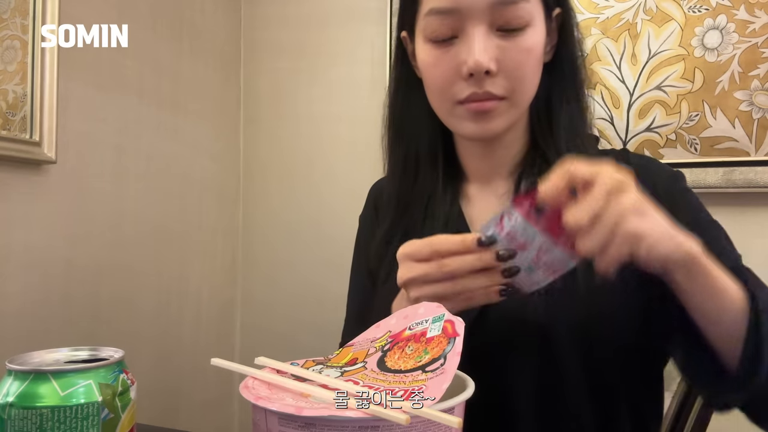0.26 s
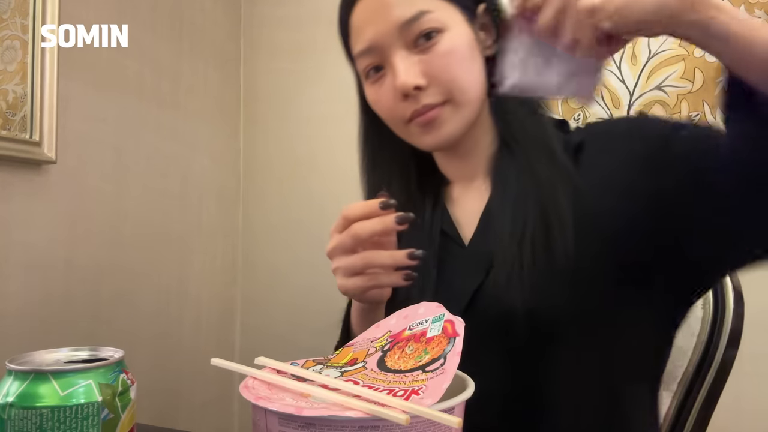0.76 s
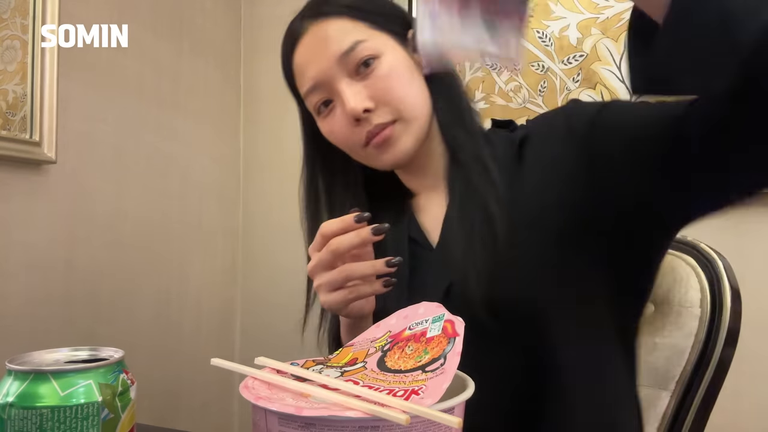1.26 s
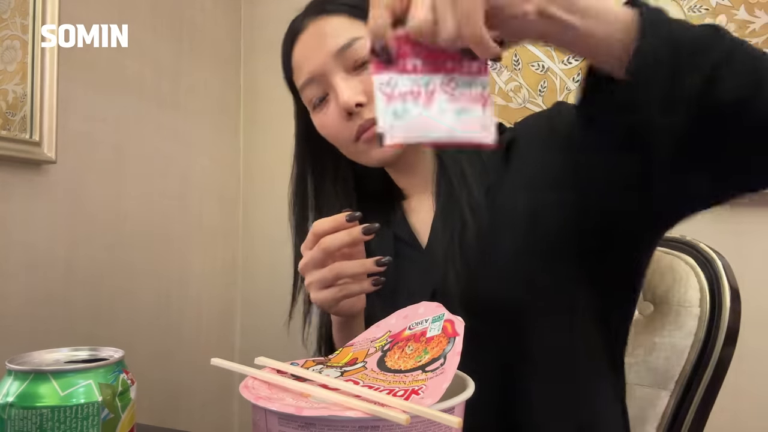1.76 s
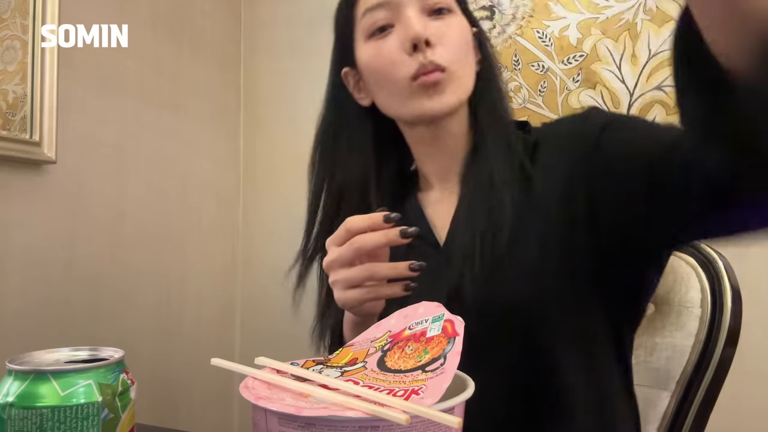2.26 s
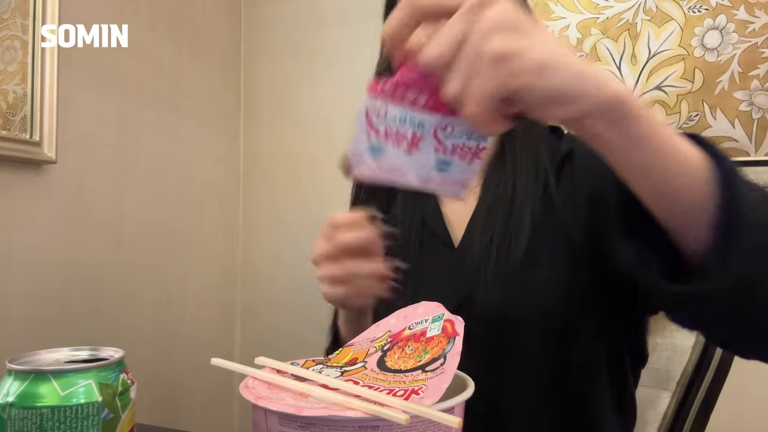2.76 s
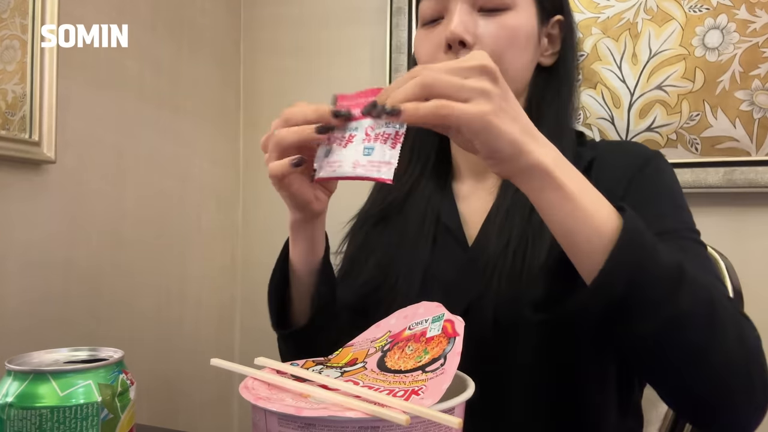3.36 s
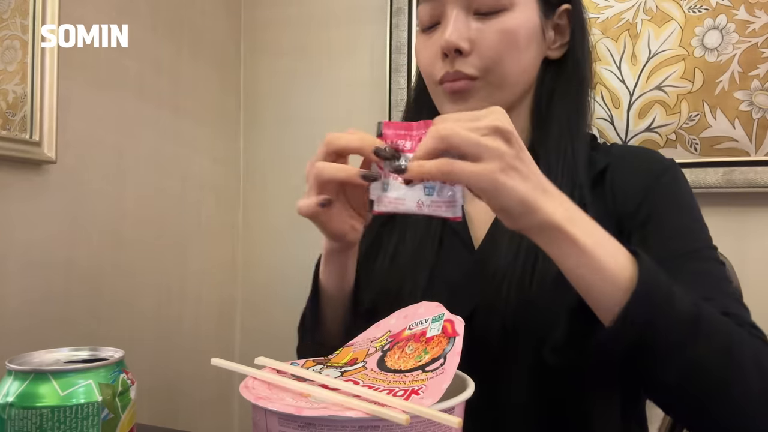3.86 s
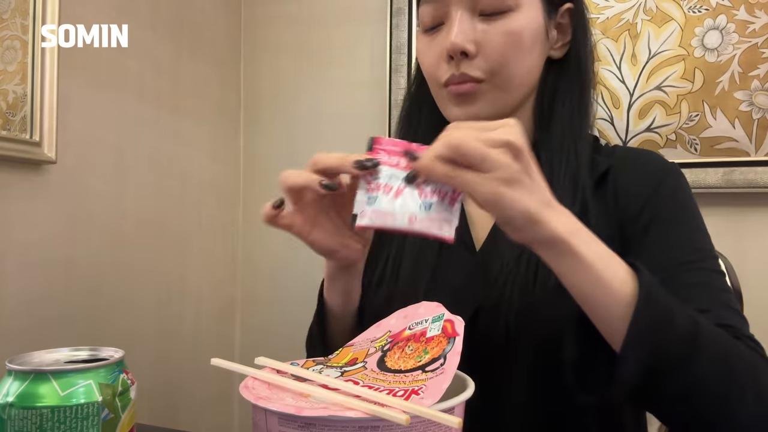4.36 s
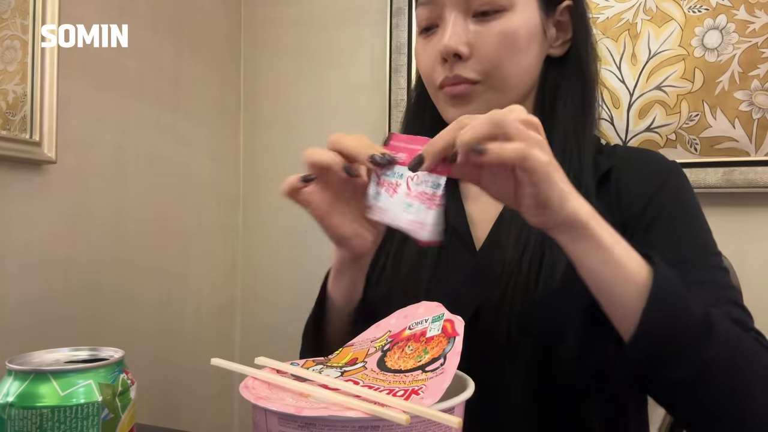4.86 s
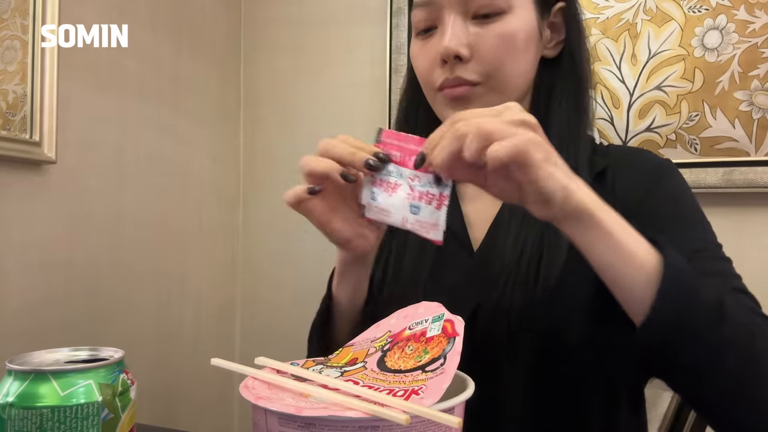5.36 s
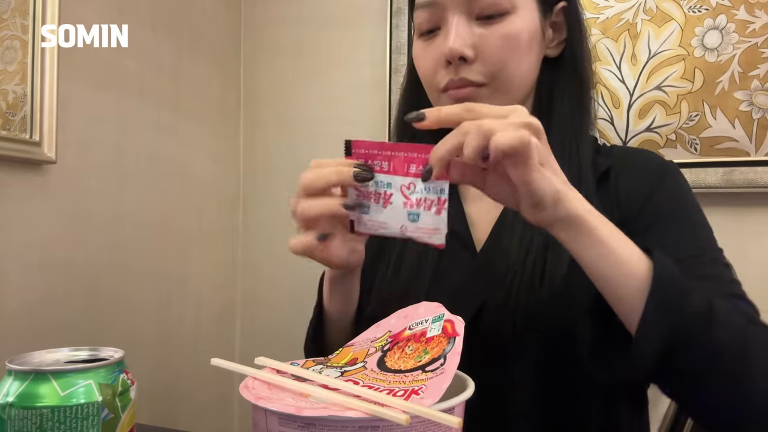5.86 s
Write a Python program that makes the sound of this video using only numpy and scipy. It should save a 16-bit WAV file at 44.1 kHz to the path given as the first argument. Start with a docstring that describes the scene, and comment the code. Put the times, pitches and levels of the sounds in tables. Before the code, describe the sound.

A filled foil-plastic sauce sachet is shaken in quick swings, then pinched and worked between fingers, crackling densely and loudly close to the microphone.

```python
"""Throughout, a low wavering hum lies under the room's rumble. A foil-plastic sauce sachet is first shaken by
its top edge in quick runs of swings: each looses a cloud of tiny crackles, and the filled pouch pops as it flexes.
It is then turned in the fingertips with light ticks, pinched and worked open by both hands close to a
microphone, and lightly fingered again. Each crease is a burst of noise filtered by the film's own resonance;
each pop is a damped sine of falling pitch; the table top and walls answer briefly."""
import sys
import numpy as np
from scipy import signal
from scipy.fft import rfft, irfft
from scipy.io import wavfile
from scipy.ndimage import uniform_filter1d, map_coordinates

SR = 44100
rng = np.random.default_rng(int(sys.argv[2]) if len(sys.argv) > 2 else 0)


def transcribe(u):
    """Save the signal u as a 16-bit wav file named by the first command-line argument.

    u: samples, shape (n,) or (channels, n), limited to [-1, 1]; the rate is SR.
    q: integer samples, one column per channel.
    """
    v = np.clip(np.atleast_2d(u).T, -1, 1)
    q = np.round(v * 32767).astype(np.int16)
    wavfile.write(sys.argv[1], SR, q)


N = 269010
T = np.arange(N) / SR

# Room rumble, spectral density: frequency_hz, relative_density_db (per Hz)
RUMBLE_SPECTRUM = [(15, 1.5), (29, -6), (39, -23), (52, 5), (70, -4), (130, 0.5), (170, -3.5), (240, -10.5),
                   (330, -13.5), (600, -22), (850, -23), (1400, -41), (4000, -47), (16000, -55)]
# Strength of the deep hum: time_s, level_db
HUM_LEVEL = [(0, -48), (0.25, -76.5), (0.55, -40), (1.0, -37), (1.25, -49), (1.85, -39), (2.55, -38),
             (2.75, -57), (2.92, -34.5), (3.3, -46.5), (4.75, -43.5), (6.1, -45.5)]
# Weaker companions of the hum: frequency_hz, level_db, wander_rate_hz
NARROW_DRONES = [(127.6, -44.5, 9), (243.3, -51, 5)]
# Colour of the room's answer: frequency_hz, gain_db
WALL_COLOUR = [(100, 1.5), (450, 0), (900, 2.5), (2000, -1.5), (5000, -2), (9000, -7), (16000, -0.5)]
# Table-top echo, later the higher the sachet is held: time_s, lag_ms
TABLE_LAG = [(.4, 0.43), (1, 0.57), (2.25, 0.72), (3, 0.486), (6.1, 0.4)]
# Colour of a broad, slack facet of film: frequency_hz, relative_gain_db
SLACK_COLOUR = [(100, -33.5), (300, -6.5), (520, -4), (780, -8), (1150, 1.4), (1650, -1), (2250, -2.5),
                (2900, -10), (4400, -10.5), (7000, -10), (11000, -21.5), (16000, -27)]
# Colour of a small, taut crease: frequency_hz, relative_gain_db
TAUT_COLOUR = [(100, -58), (900, -21), (1500, 6), (2300, 6), (3300, 2), (4800, 2.5), (6000, 0), (7200, 0),
               (9200, -0.5), (11500, -5.5), (14000, -3.5), (16000, -16)]
# Steady crinkling under the fingers: time_s, relative_level_db
GRIP_LEVEL = [(0.0, -48), (0.2, -82), (0.3, -50), (0.5, -35), (1.1, -36), (1.24, -55), (1.35, -38.5),
              (1.68, -36), (1.84, -48), (2.0, -31), (2.6, -36), (2.85, -48), (3.55, -45), (3.8, -33),
              (4.2, -38), (5.0, -31.5), (5.65, -32.5), (5.95, -47.5)]
# Swings of the shaken sachet; the crackle swells up to the pop's moment, holds, then lets go:
# pop_s, relative_crackle_db, hold_s, relative_pop_db
SWING_STROKES = [(0.408, -23.5, .04, -34), (0.522, -22.5, .04, -41.5), (0.632, -23.5, .012, -26),
                 (0.683, -24.5, .02, -38), (0.79, -34, .025, -33.5), (0.845, -29, .06, -37),
                 (0.963, -25, .03, -28.5), (1.045, -26, .06, -32), (1.177, -33, .012, -34.5),
                 (1.315, -23, .03, -35), (1.41, -24, .04, -25), (1.518, -22, .03, -22),
                 (1.615, -21, .045, -25.5), (1.752, -32.5, .008, -29.5), (1.904, -26, .025, -27),
                 (1.991, -18.5, .04, -17.5), (2.11, -23.5, .03, -26.5), (2.192, -17, 0.018, -23.5),
                 (2.242, -22, .012, -60.5), (2.3, -31, .008, -30), (2.335, -23, .022, -35),
                 (2.402, -22, .02, -23.5), (2.452, -27, .008, -35), (2.532, -19, .022, -35),
                 (2.617, -19, .012, -26.5)]
# Pinches with both hands, in the same form: pop_s, relative_crackle_db, hold_s, relative_pop_db
PINCH_STROKES = [(3.222, -34, .008, -36), (3.463, -36, .005, -32.5), (3.705, -28, .05, -35),
                 (3.83, -22, .03, -26), (3.908, -23, .03, -25), (4.005, -24, .03, -47),
                 (4.137, -25, .035, -33), (4.254, -22, .02, -39), (4.36, -26, .045, -34),
                 (4.457, -26.5, .02, -53), (4.557, -27, .022, -42), (4.685, -25, .012, -53),
                 (4.764, -25, .01, -29), (4.838, -25, .015, -25), (4.915, -26.5, .035, -30),
                 (5.019, -27, .045, -19), (5.1, -24, .015, -25), (5.14, -31, .02, -22.5),
                 (5.187, -24.5, .01, -21.5), (5.255, -20.5, .01, -18.5), (5.333, -18.5, .01, -31),
                 (5.355, -27.5, .02, -17.5), (5.425, -27, .08, -22.5), (5.522, -25, 0.052, -15),
                 (5.601, -28.5, .03, -20), (5.665, -23, .03, -50), (5.71, -33, 0.061, -33),
                 (6.074, -27.5, .006, -36)]
# Fingertips shifting lightly on the sachet: start_s, end_s, typical_level_db
FINGER_TOUCHES = [(2.72, 3.52, -28), (5.78, 6.085, -27)]
# Firmness of the fingers on the filled part: time_s, gain_db
FINGER_PRESSURE = [(2.6, -14.5), (3, -7.5), (3.8, -17), (4.6, -12), (5.1, -6.5), (5.8, -11)]
# Tautness of the middling creases, as their central ring: time_s, pitch_hz
CREASE_PITCH = [(1.7, 4450), (2.3, 3520), (3.4, 3280), (4.6, 4060)]
# Loudest and isolated creases: time_s, relative_level_db (over 2 ms), central_pitch_hz
LOUD_SNAPS = [(0.0165, -28.5, 4200), (0.116, -51, 10470), (0.2525, -25, 4050), (0.319, -29, 2510),
              (0.3417, -22.5, 2700), (0.406, -16, 4130), (0.5242, -14, 3560), (0.5276, -13.5, 4320),
              (0.601, -21.5, 2864), (0.6267, -16, 3430), (0.6342, -25, 2940), (0.6931, -11.5, 3500),
              (0.842, -15.5, 1850), (0.8851, -16.5, 6400), (0.9695, -11, 4900), (1.0954, -21, 3560),
              (1.185, -21, 7040), (1.2648, -20.5, 3250), (1.3249, -12, 4340), (1.4083, -12, 5600),
              (1.4309, -5.5, 3670), (1.4435, -14, 5700), (1.5185, -13, 2030), (1.6126, -13, 6700),
              (1.6475, -15.5, 2940), (1.8165, -19.5, 1640), (1.906, -21.5, 3000), (1.99, -11, 3200),
              (1.9961, -15, 5500), (2.0054, -13, 3550), (2.0303, -24, 7300), (2.0804, -17.5, 2500),
              (2.1074, -7, 3900), (2.1388, -16.5, 5330), (2.2076, -8, 5600), (2.238, -11.5, 6550),
              (2.2983, -13, 2280), (2.3274, -9, 1510), (2.348, -11, 4100), (2.3516, -9.5, 2320),
              (2.3585, -11.5, 2830), (2.4007, -8.5, 6300), (2.417, -8.5, 4580), (2.454, -9, 4920),
              (2.4927, -11.5, 5100), (2.5464, -11, 2920), (2.622, -9.5, 6600), (2.7058, -20.5, 3670),
              (2.734, -19.5, 2360), (2.8584, -37, 2960), (2.9064, -48, 2100), (2.9789, -37.5, 3800),
              (3.329, -27, 2750), (3.3326, -21.5, 2340), (3.403, -25, 3100), (3.4181, -17, 5160),
              (3.4654, -23.5, 2150), (3.5624, -15, 4670), (3.665, -29, 5070), (3.703, -12.5, 2800),
              (3.7344, -12.5, 4550), (3.7614, -20.5, 5130), (3.8344, -12.5, 3820), (3.9164, -15, 6700),
              (4.0067, -15, 5300), (4.111, -14, 3800), (4.1687, -40, 5400), (4.2065, -22, 4350),
              (4.2499, -12.5, 5650), (4.361, -17.5, 2800), (4.3948, -14.5, 5900), (4.4701, -8, 3630),
              (4.561, -22.5, 3020), (4.6477, -11.5, 4250), (4.6529, -10.5, 3970), (4.6941, -17.5, 4000),
              (4.754, -17, 4440), (4.76, -9.5, 6750), (4.846, -12, 5360), (4.8907, -20, 3340),
              (4.9497, -17, 3400), (5.0184, -7.5, 4830), (5.1372, -10, 3330), (5.1578, -9.5, 7100),
              (5.182, -9, 3400), (5.2531, -15, 3500), (5.3149, -8, 5900), (5.3375, -11.5, 4740),
              (5.3544, -7.5, 3880), (5.41, -18, 3600), (5.4221, -24, 2200), (5.4307, -14.5, 4550),
              (5.452, -22, 3630), (5.472, -14, 4900), (5.5197, -8.5, 4700), (5.558, -16.5, 5500),
              (5.5993, -13, 4570), (5.6525, -8, 4900), (5.6608, -10, 5150), (5.689, -1, 4100),
              (5.8173, -25, 2980), (5.9545, -24, 2230), (6.0741, -29, 3250)]

HUM_HZ = 56.4
ROOM_T60_S = .27
SLACK_HZ, TAUT_HZ = 2060, 5730  # ring of a wholly slack and a wholly taut fold
POP_HZ, POP_AT_DB, POP_FALL_HZ_PER_DB = 505, -34.5, 2.5  # a deeper flex pops lower
RISE_S = .00035  # a snap starts this long before its listed time
SNAP_SPAN = np.sqrt(.002 * SR)  # gives a unit-energy fold an rms of one over 2 ms
TOP_HZ = 16000


def undb(db):
    """Decibel law: a level becomes an amplitude gain."""
    return 10 ** (np.asarray(db) / 20)


def unit(x):
    """Normalisation: scale to an rms of one."""
    return x / np.sqrt(np.mean(x ** 2))


def curve(rows):
    """Linear interpolation: join (time_s, value) rows by straight lines."""
    return np.interp(T, *np.transpose(rows))


def add(out, s, sound):
    """Superposition: mix a sound in, starting at s seconds."""
    i = int(np.clip(s * SR, 0, N - 1))
    out[i:i + len(sound)] += sound[:N - i]


def shape(points, size):
    """Spectral envelope: gain at each bin, joined over log frequency from (frequency_hz, gain_db) rows."""
    hz, db = np.transpose(points)
    bins = np.fft.rfftfreq(size, 1 / SR) + 1
    return undb(np.interp(np.log(bins), np.log(hz), db))


def colour(x, gain):
    """Minimum-phase filtering: a causal response to the given gains keeps attacks sharp."""
    size = len(x)
    cepstrum = irfft(np.log(gain + 1e-9), size)
    # folding the cepstrum onto positive time makes the response causal
    cepstrum[1:size // 2] *= 2
    cepstrum[size // 2 + 1:] = 0
    return irfft(rfft(x) * np.exp(rfft(cepstrum)), size)


def band_noise(x, low_hz, high_hz):
    """Band-pass filtering: the part of x between two frequencies, at unit rms."""
    band = signal.butter(3, [low_hz, high_hz], "band", fs=SR, output="sos")
    return unit(signal.sosfilt(band, x))


def walk(rate):
    """Low-passed random drift: held random values, smoothed twice, with a spread near one."""
    k = int(SR / rate)
    held = np.repeat(rng.standard_normal(N // k + 1), k)
    smooth = uniform_filter1d(uniform_filter1d(held, k), k)
    return unit(smooth[:N])


def ticks(rate, scatter_db):
    """Poisson process: impulses at random moments, many small, few large; power is independent of rate."""
    fires = rng.random(N) < rate / SR
    heights = undb(scatter_db * np.minimum(rng.exponential(size=N), 3.5))
    return unit(fires * heights / np.sqrt(rate))


def background(rumble_db=-40, waver=0.0057):
    """Steady sources: a frequency-modulated hum and two narrow-band drones over shaped noise."""
    spectrum = rfft(rng.standard_normal(N)) * shape(RUMBLE_SPECTRUM, N)
    out = undb(rumble_db) * unit(irfft(spectrum, N))
    phase = 2 * np.pi * np.cumsum(HUM_HZ * (1 + waver * walk(4.87))) / SR
    out += undb(curve(HUM_LEVEL)) * unit(np.sin(phase))
    for hz, db, width in NARROW_DRONES:
        turn = 2 * np.pi * hz * T
        # drifting sine and cosine parts broaden the line
        out += undb(db) * unit(walk(width) * np.sin(turn) + walk(width) * np.cos(turn))
    return out


def room(x, wet_db=-10, early_db=-16, early_s=0.00991, size=16384):
    """Reverberation: scattered reflections from table and near wall, then an exponential diffuse tail."""
    t = np.arange(size) / SR
    decay = np.exp(-np.log(1000) * t / ROOM_T60_S)
    tail = rng.standard_normal(size) * decay * (1 - np.exp(-t / 0.0081))
    early = rng.standard_normal(size) * (t > early_s) * np.exp(-np.abs(t - early_s) / 0.0016)
    response = (undb(wet_db) * unit(tail) + undb(early_db) * unit(early)) / np.sqrt(size)
    return x + signal.oaconvolve(x, colour(response, shape(WALL_COLOUR, size)))[:N]


def table_top(x, echo_db=-12.0):
    """Comb interference: one delayed echo combs the sachet's sound; the comb slides with the hand's height."""
    late = np.arange(N) - curve(TABLE_LAG) * SR / 1000  # fractional sample positions
    return x + undb(echo_db) * map_coordinates(x, [late], order=3)


def swells(strokes, attack_s, release_s):
    """Exponential build-up and release: summed power of strokes that swell up to pop_s, hold and let go."""
    power = np.zeros(N)
    for pop_s, db, hold, _ in strokes:
        near = (T > pop_s - 8 * attack_s) & (T < pop_s + hold + 8 * release_s)
        t = T[near] - pop_s
        envelope = np.exp(np.minimum(t, 0) / attack_s - np.maximum(t - hold, 0) / release_s)
        power[near] += (undb(db) * envelope) ** 2
    return power


def strain(swing_db=-0.5, pinch_db=-0.5, grip_db=-1.5):
    """Power addition: the working of the film is the steady grip plus a swell per swing or pinch."""
    grip = undb(curve(GRIP_LEVEL) + grip_db) ** 2
    swings = undb(swing_db) ** 2 * swells(SWING_STROKES, attack_s=.008, release_s=.008)
    pinches = undb(pinch_db) ** 2 * swells(PINCH_STROKES, attack_s=.0035, release_s=.006)
    return np.sqrt(grip + swings + pinches)


def fold(hz, rise_s=0.00021, flutter_s=0.0034, flutter_db=-19, ring_db=9, ring_octaves=0.24, detune=0.3,
         edge_db=3.0, edge_hz=9500, size=1024):
    """Buckling: a jolt and a flutter excite the film; taut folds are brighter and die sooner. Unit energy."""
    t, bins = np.arange(size) / SR, np.fft.rfftfreq(size, 1 / SR) + 1
    taut = np.clip(np.log(hz / SLACK_HZ) / np.log(TAUT_HZ / SLACK_HZ), 0, 1)
    decay_s = 0.000686 - 0.0002303 * taut
    jolt = np.exp(-t / decay_s) + undb(flutter_db) * np.exp(-t / flutter_s)
    jolt *= 1 - np.exp(-t / rise_s)
    slack_power = unit(shape(SLACK_COLOUR, size)) ** 2
    taut_power = unit(shape(TAUT_COLOUR, size)) ** 2
    film = np.sqrt((1 - taut) * slack_power + taut * taut_power)
    # every fold has a resonance of its own, and a sharper or blunter edge
    octaves = np.log2(bins / hz) + detune * rng.standard_normal()
    ring = undb(ring_db / (1 + (octaves / ring_octaves) ** 2))
    edge = undb(edge_db * rng.standard_normal() * bins ** 2 / (bins ** 2 + edge_hz ** 2))
    sound = colour(jolt * rng.standard_normal(size), film * ring * edge)
    return sound / np.linalg.norm(sound)


def fingertips(rate=24, unevenness=.5, scatter_db=3, ring_hz=2900, spread=0.23, knock_db=-7, knock_hz=490,
               knock_s=.003, count=40, size=1024):
    """Coupled bodies: separate ticks of slack film, each with a soft damped knock of the pouch behind it."""
    out, t = np.zeros(N), np.arange(size) / SR
    for start, end, db in FINGER_TOUCHES:
        wait, strength, tone = rng.standard_normal((count, 3)).T
        moments = start + np.cumsum(np.exp(unevenness * wait)) / rate
        louder_db = scatter_db * np.clip(strength, -2, 1)
        for s, louder, detune in zip(moments, louder_db, np.exp(spread * tone)):
            knock = t * np.exp(-t / knock_s) * np.sin(2 * np.pi * knock_hz * detune * t)
            tick = fold(ring_hz * detune) + undb(knock_db) * knock / np.linalg.norm(knock)
            if s < end:
                add(out, s, undb(db + louder) * SNAP_SPAN * tick)
    return out


def knead(force, rate=220, scatter_db=3, deep_db=-7):
    """Band-limited excitation: hollow wall buckles and a dull sauce thud, stronger as the fingers close."""
    pushes = force * undb(curve(FINGER_PRESSURE)) * ticks(rate, scatter_db)
    wall = band_noise(pushes, low_hz=450, high_hz=740)
    sauce = band_noise(pushes, low_hz=170, high_hz=300)
    return pushes.std() * (wall + undb(deep_db) * sauce)


def pouch(gain_db=-0.5, decay_s=0.0024, rise_s=0.0014, sag=0.27, sag_s=0.0031, slosh_db=-15,
          slosh_s=0.0069, slosh_low=0.39, slosh_high=1.5, detune=0.027, size=2048):
    """Snap-through: at each stroke the wall pops over in a few low, sagging cycles, damped by the sauce."""
    out, t = np.zeros(N), np.arange(size) / SR
    for pop_s, _, _, db in list(SWING_STROKES) + list(PINCH_STROKES):
        hz = POP_HZ - POP_FALL_HZ_PER_DB * (db - POP_AT_DB)
        hz *= np.exp(detune * rng.standard_normal())
        pitch = hz * (1 - sag + 2 * sag * np.exp(-t / sag_s))
        pop = np.sin(2 * np.pi * np.cumsum(pitch) / SR) * np.exp(-t / decay_s)
        slosh = band_noise(rng.standard_normal(size), hz * slosh_low, hz * slosh_high)
        slosh *= np.exp(-t / slosh_s)
        sound = (1 - np.exp(-t / rise_s)) * (pop + undb(slosh_db) * slosh)
        # the level is that of the first eighth
        add(out, pop_s, undb(db + gain_db) * sound / sound[:size // 8].std())
    return out


def crinkle(force, shaken_rate=1000, pinched_rate=580, scatter_db=3.5, shaken_hz=2900, pinched_hz=3650,
            spread=0.56, crowding=0.4, count=24):
    """Crackling noise: swarms of tiny folds, denser under force; sparser and higher once both hands pull taut."""
    out = np.zeros(N)
    pinch_s = 3
    shaken = (T < pinch_s, shaken_rate, shaken_hz)
    pinched = (T >= pinch_s, pinched_rate, pinched_hz)
    for held, rate, hz in (shaken, pinched):
        pushes = (force * ticks(rate * unit(force) ** crowding, scatter_db))[held]
        which = rng.integers(0, count, held.sum())  # each push sounds one of the folds
        for k, offset in enumerate(np.linspace(-1.7, 1.7, count)):
            swarm = signal.oaconvolve(pushes * (which == k), fold(hz * np.exp(spread * offset)))
            add(out, T[held][0], swarm)
    return out


def creases(force, gain_db=-1, shaken_rate=85, pinched_rate=60, crowding=.7, unevenness=.5, scatter_db=3,
            spread=0.36, count=900):
    """Stick and release: strain builds up until a middling crease gives way, sooner and louder under force."""
    out = np.zeros(N)
    rate = curve([(2.7, shaken_rate), (3.3, pinched_rate)]) * unit(force) ** crowding
    ring_hz = curve(CREASE_PITCH)
    wait, strength, tone = rng.standard_normal((count, 3)).T
    # a crease goes when the accumulated strain reaches its random threshold
    thresholds = np.cumsum(np.exp(unevenness * wait))
    moments = np.searchsorted(np.cumsum(rate) / SR, thresholds)
    gains = unit(undb(scatter_db * np.clip(strength, -2, 1)))
    for i, gain, detune in zip(moments, gains, np.exp(spread * tone)):
        if i < N:
            level = undb(gain_db) * gain * force[i] * np.sqrt(SR / rate[i])
            add(out, T[i], level * fold(ring_hz[i] * detune))
    return out


def snaps(force, gain_db=1.0, neighbour_db=1, before_s=0.0028, after_s=.005):
    """Triggered buckling: each loud crease rings; a fold in the strained film gives way just before and after."""
    out = np.zeros(N)
    for s, db, hz in LOUD_SNAPS:
        add(out, s - RISE_S, undb(db + gain_db) * SNAP_SPAN * fold(hz))
        neighbours = s + np.array([-before_s, after_s]) * rng.uniform(0.42, 1.6, 2)
        for near in neighbours:
            level = undb(neighbour_db) * np.interp(near, T, force)
            add(out, near, level * SNAP_SPAN * fold(hz))
    return out


def scene(crinkle_db=-5):
    """Superposition: snaps, pops and strain-driven folds above a table, in a room with a steady background."""
    force = strain()
    film = snaps(force) + creases(force) + undb(crinkle_db) * crinkle(force) + fingertips()
    sachet = film + pouch() + knead(force)
    return (room(table_top(sachet)) + background())[None]


def record(dry):
    """Clipping and band limiting: flatten peaks beyond full scale, then cut the top."""
    low_pass = signal.ellip(12, .2, 80, TOP_HZ, fs=SR, output="sos")
    return signal.sosfilt(low_pass, np.clip(dry, -1, 1))


dry = scene()
out = record(dry)
transcribe(out)
```